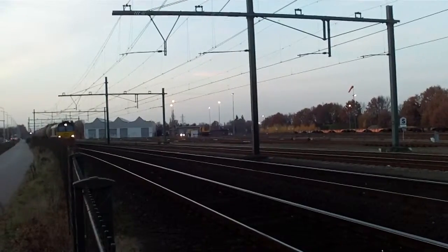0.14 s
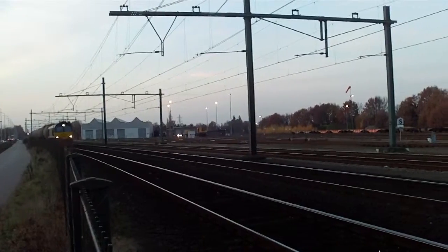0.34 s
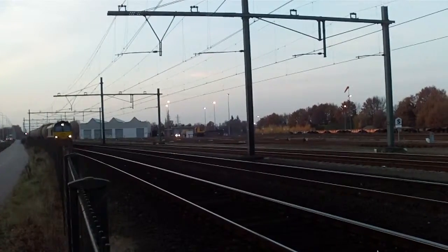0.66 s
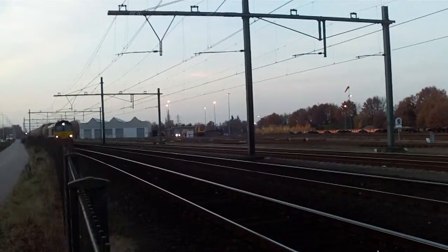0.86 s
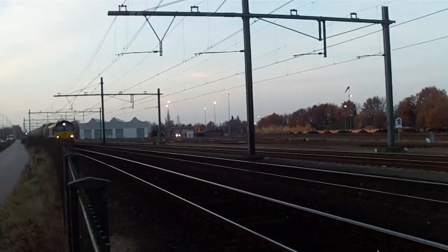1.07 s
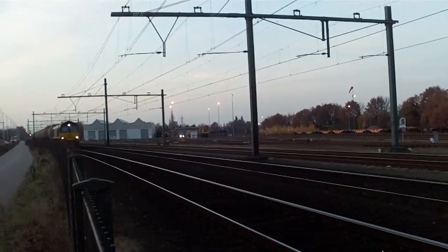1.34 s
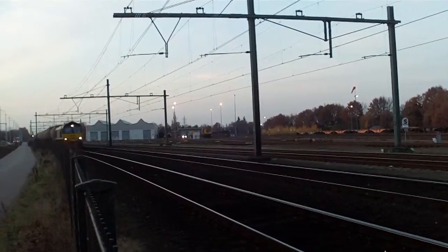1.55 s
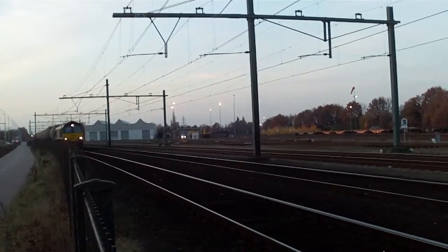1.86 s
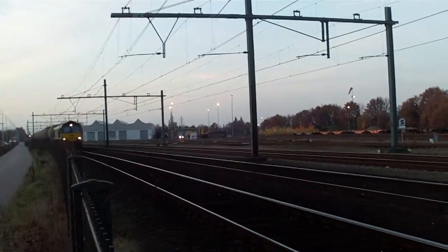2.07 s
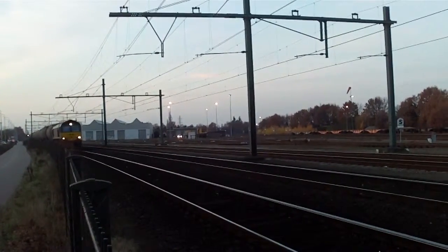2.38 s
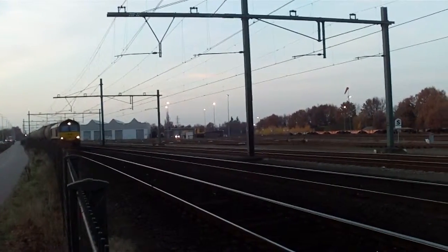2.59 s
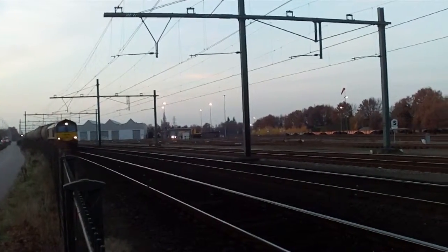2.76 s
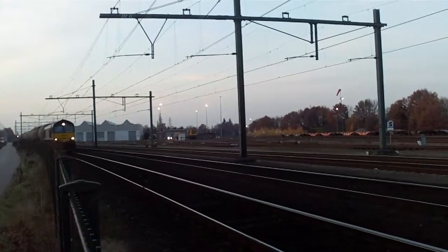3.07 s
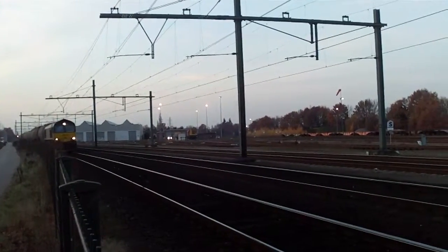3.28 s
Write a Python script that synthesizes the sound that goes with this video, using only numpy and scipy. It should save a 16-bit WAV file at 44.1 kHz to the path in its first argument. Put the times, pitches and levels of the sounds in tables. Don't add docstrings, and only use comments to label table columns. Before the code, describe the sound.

A diesel locomotive throbs deeply, about eleven pulses a second, with faint whines; it swells around 0.6 s, eases near 1.9 s and is loudest by 3.4 s. Low wind buffets thump the microphone, strongest at the start, 0.6 s and after 2.6 s. Distant traffic roars softly; a car's tyre roar grows from 1.6 s, hum and hiss joining after 2.5 s. Faint rustles and dry ticks cluster around 2.3-3.1 s.

```python
import sys
import numpy as np
from scipy import signal
from scipy.fft import rfft, irfft, next_fast_len
from scipy.io import wavfile

SR = 44100
rng = np.random.default_rng(int(sys.argv[2]) if len(sys.argv) > 2 else 0)


def gain_from_db(level_db):
    decades = np.asarray(level_db, float) / 20
    return 10 ** decades


def digitize_waveform(pressure):
    field = np.atleast_2d(pressure).T
    bounded = np.clip(field, -1, 1)
    quanta = np.round(bounded * 32767).astype(np.int16)
    wavfile.write(sys.argv[1], SR, quanta)


N = 151263

TURN_HZ = 10.97
THROB_TURNS, SAG_TURNS, START_TURNS = 0.415, 0.175, 0.32
# multiple of the turn rate, level in dB rms.
EXHAUST_ORDERS = [(3, -41), (4, -41), (5, -33), (6, -31.5), (7, -32), (9, -45), (10, -47), (13, -54)]
# time in seconds, throb gain in dB.
ENGINE_LOAD = [
    (0, -4),
    (.6, 2),
    (1.4, 1.5),
    (1.9, -0.5),
    (2.6, -0.5),
    (3.43, 4.5),
]
# frequency in Hz, level in dB rms, wander in dB, swell in dB per s.
MACHINE_WHINES = [(87.2, -38, 2.5, 1.0), (157, -50, 3.0, -2.5), (435, -64, 2.5, 0.),
                  (522.2, -54, 2.5, -1.5), (610, -61, 2.5, 0.), (866.7, -56, 2.5, 2.0),
                  (1283, -63, 2.5, 0.), (1700, -62, 2.5, .6), (1733, -61, 2.5, .3)]

# frequency in Hz, density in dB per Hz.
FAR_ROAR_SPECTRUM = [(110, -8.5), (200, -4.5), (380, -11), (800, -6.5), (1700, -18.5), (3300, -27),
                     (6000, -33.5), (9000, -39.5)]
FAR_ROAR_DB = -40
# time in seconds, tyre roar in dB, tread hum in dB, spray hiss in dB.
CAR_LEVELS = [(0, -51.5, -59, -62), (1.0, -50.5, -49.5, -61.5), (1.6, -47, -51, -62),
              (2.2, -42.5, -50, -78), (2.62, -43.5, -45, -49), (2.83, -43, -43.5, -44),
              (3.02, -45, -41.5, -44), (3.27, -44, -35.5, -46), (3.43, -42.5, -38.5, -46.5)]
# frequency in Hz, density in dB per Hz.
TYRE_SPECTRUM = [(500, -25), (1100, -5), (1600, 3.5), (2400, -0.5), (3300, -14), (6000, -27.5)]
TREAD_SPECTRUM = [(400, -20), (720, -11), (950, 3), (1250, -7.5), (1730, -15), (2200, -51)]
SPRAY_SPECTRUM = [(1500, -2), (3000, 1), (4400, -2.5), (5800, -6), (7000, -7), (9500, -9.5), (12000, -17.5),
                  (16500, -23)]

# frequency in Hz, density in dB per Hz.
AIR_SPECTRUM = [(2500, 7), (5000, -16), (9000, 3.5), (11500, 1), (13500, -2.5), (16500, -11)]
AIR_DB, AIR_FADE_DB_PER_S = -62, 0.6

# time in seconds, pressure noise in dB, flutter in dB.
GUST_LEVELS = [(0, -21.5, -33), (.13, -24, -29), (.21, -26.5, -33.5), (.45, -26.5, -33.5), (.62, -20, -36),
               (.75, -31.5, -42.5), (1.25, -29, -43.5), (1.45, -27, -45), (1.7, -27, -47), (2.05, -26, -51),
               (2.35, -26.5, -60), (2.6, -22.5, -37), (2.8, -30, -38.5), (2.93, -22, -30), (3.05, -23, -42),
               (3.25, -22, -41), (3.38, -20, -27), (3.43, -19, -31)]
# frequency in Hz, density in dB per Hz.
WIND_SPECTRUM = [(6, -3), (15, 0), (32, 0), (55, -7), (90, -13), (140, -18), (250, -28), (450, -42)]
PORT_FLUTTER_HZ = 126
# time in seconds, peak in dB, width in seconds, sign.
PORT_BUFFETS = [(0.052, -11, 0.0094, -1), (0.066, -11, 0.0045, 1), (.113, -17, 0.0028, 1),
                (.278, -15, 0.002, 1), (.348, -13.5, 0.0042, 1), (0.429, -15.5, 0.015, 1),
                (0.607, -9.5, 0.0019, -1), (1.372, -14, 0.0073, -1), (1.468, -13, .005, -1),
                (1.918, -13, 0.0104, -1), (2.329, -16.5, 0.006, -1), (2.675, -11.5, 0.0071, -1),
                (2.919, -12.5, 0.0036, 1), (2.931, -15, 0.0038, 1), (2.951, -8, 0.0057, -1),
                (3.11, -11, 0.0054, 1), (3.319, -15, 0.011, 1), (3.358, -9.5, 0.0048, 1),
                (3.381, -6.5, 0.0082, -1)]

# frequency in Hz, density in dB per Hz.
BRIGHT_SPECTRUM = [(3000, -25), (5500, -9), (6500, -3), (9500, 0), (11500, -4), (13700, -11), (16500, -26)]
DULL_SPECTRUM = [(2500, -15), (3600, -2), (4200, 0), (5300, -4), (7000, -7), (11000, -15), (15000, -22)]
# centre in seconds, level in dB, length in seconds, dull share 0-1.
RUSTLE_EVENTS = [(.25, -59, 0.17, 0.2), (0.503, -57, 0.14, 0.9), (.85, -66, .15, .2), (1.4, -54.5, .06, 1),
                 (1.935, -62, .04, 0.), (2.148, -64, 0.26, 0.), (2.298, -53, 0.05, 0.2),
                 (2.463, -60.5, 0.19, 0.), (2.646, -56, .06, 0.), (2.73, -53, 0.08, 0.),
                 (2.81, -53, .07, .3), (2.89, -51, .09, 0.6), (3.02, -56, .14, 0.8)]
# start in seconds, peak in dB, frequency in Hz, 60 dB decay in seconds.
DRY_TICKS = [
    (.174, -48, 13500, .002),
    (1.386, -50, 3980, .05),
    (1.41, -44, 4150, .045),
    (2.0, -53, 14000, .003),
    (2.098, -46, 9300, .003),
    (2.099, -48, 13000, .002),
    (2.918, -36, 7300, .003),
    (2.919, -40, 9500, .003),
    (2.92, -39, 4000, .004),
    (3.083, -40, 6500, .003),
]

CIRCUIT_HZ, CIRCUIT_DB = 11989, -81
STEP_DB, STEP_S = -16, 0.002


def rms_one(x):
    return x / np.sqrt(np.mean(x ** 2) + 1e-20)


def in_time(rows):
    s, *columns = np.transpose(rows)
    t = np.arange(N) / SR
    return [np.interp(t, s, column) for column in columns]


def drift(rate_hz):
    pole = np.exp(-80 * np.pi * rate_hz / SR)
    noise = rng.standard_normal(N // 40 + 2002)
    slow = signal.lfilter([1], [1, -2 * pole, pole * pole], noise)[2000:]
    return np.interp(np.arange(N) / 40, np.arange(len(slow)), rms_one(slow))


def coloured(spectrum, patchy_db, rate_hz):
    size = next_fast_len(N)
    hz = np.maximum(np.fft.rfftfreq(size, 1 / SR), 1)
    point_hz, point_db = np.transpose(spectrum)
    density_db = np.interp(np.log(hz), np.log(point_hz), point_db, left=-90, right=-90)
    shaped = rfft(rng.standard_normal(size)) * gain_from_db(density_db)
    half_octave = np.maximum(2 * np.log2(hz), 4)
    together = drift(rate_hz / 2)
    out = 0
    for centre in np.arange(4, 29):
        band = shaped * np.clip(1 - abs(half_octave - centre), 0, 1)
        if abs(band).max() > 1:
            flicker_db = patchy_db * (0.62 * together + drift(rate_hz))
            out = out + irfft(band, size)[:N] * gain_from_db(flicker_db)
    return rms_one(out)


def locomotive():
    t = np.arange(N) / SR
    turns = TURN_HZ * t + 0.003 * drift(1.5)
    throb = 0
    for order, db in EXHAUST_ORDERS:
        offset = order - 6
        phase_turns = START_TURNS - THROB_TURNS * offset + SAG_TURNS * offset ** 2
        throb = throb + gain_from_db(db + drift(0.5)) * np.cos(2 * np.pi * (order * turns + phase_turns))
    whine = 0
    for hz, db, wander_db, swell_db_per_s in MACHINE_WHINES:
        level_db = db + wander_db * drift(3.0) + swell_db_per_s * (t - t.mean())
        cycles = hz * t - 0.1 + 0.05 * drift(2.5)
        whine = whine + gain_from_db(level_db) * np.sin(2 * np.pi * cycles)
    load_db, = in_time(ENGINE_LOAD)
    return np.sqrt(2) * (gain_from_db(load_db) * throb + whine)


def far_roar():
    return gain_from_db(FAR_ROAR_DB) * coloured(FAR_ROAR_SPECTRUM, patchy_db=0.22, rate_hz=2.9)


def nearing_car():
    tyres_db, tread_db, spray_db = in_time(CAR_LEVELS)
    tyres = gain_from_db(tyres_db) * coloured(TYRE_SPECTRUM, patchy_db=1.9, rate_hz=2.8)
    tread = gain_from_db(tread_db) * coloured(TREAD_SPECTRUM, patchy_db=0.5, rate_hz=7.0)
    spray = gain_from_db(spray_db) * coloured(SPRAY_SPECTRUM, patchy_db=0.5, rate_hz=10.0)
    return tyres + tread + spray


def air_hiss():
    t = np.arange(N) / SR
    return gain_from_db(AIR_DB - AIR_FADE_DB_PER_S * t) * coloured(AIR_SPECTRUM, patchy_db=-0.4, rate_hz=4.2)


def wind():
    t = np.arange(N) / SR
    gust_db, flutter_db = in_time(GUST_LEVELS)
    edges_hz = [PORT_FLUTTER_HZ * 0.65, PORT_FLUTTER_HZ * 1.3]
    band = signal.butter(2, edges_hz, "band", fs=SR, output="sos")
    flutter = rms_one(signal.sosfilt(band, rng.standard_normal(N)))
    out = gain_from_db(gust_db) * coloured(WIND_SPECTRUM, patchy_db=2.5, rate_hz=10.0)
    out = out + gain_from_db(flutter_db + 1.6 * drift(18.4)) * flutter
    for s, db, width_s, sign in PORT_BUFFETS:
        u = (t - s) / width_s
        out = out + sign * gain_from_db(db) * (1 - 0.45 * u ** 2) * np.exp(-u ** 2 / 2)
    return out


def rustles():
    t = np.arange(N) / SR
    bright = coloured(BRIGHT_SPECTRUM, patchy_db=0.8, rate_hz=25.0)
    scuff = coloured(DULL_SPECTRUM, patchy_db=1.5, rate_hz=40.0)
    out = np.zeros(N)
    for s, db, length_s, dull in RUSTLE_EVENTS:
        swell = np.exp(-abs(2 * (t - s) / length_s) ** 2.5 / 2)
        friction = np.sqrt(1 - dull) * bright + np.sqrt(dull) * scuff
        out = out + gain_from_db(db) * swell * friction
    return out


def ticks():
    t = np.arange(N) / SR
    out = np.zeros(N)
    for s, db, hz, t60_s in DRY_TICKS:
        age = np.maximum(t - s, 0)
        out = out + gain_from_db(db - 60 * age / t60_s) * np.sin(2 * np.pi * hz * age)
    return out


def scene():
    mix = locomotive() + far_roar() + nearing_car() + air_hiss() + wind() + rustles() + ticks()
    return mix[None]


def top_cut(x):
    return signal.sosfilt(signal.butter(12, 15640, fs=SR, output="sos"), x)


def record(dry):
    t = np.arange(N) / SR
    whine = gain_from_db(CIRCUIT_DB + 2 * drift(2)) * np.sqrt(2) * np.sin(2 * np.pi * CIRCUIT_HZ * t)
    step = (gain_from_db(STEP_DB) - dry[:, :1]) * np.exp(-t / STEP_S)
    return top_cut(dry + whine + step)


dry = scene()
out = record(dry)
digitize_waveform(out)
```